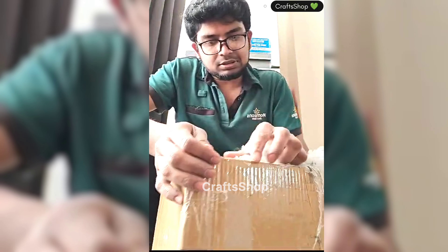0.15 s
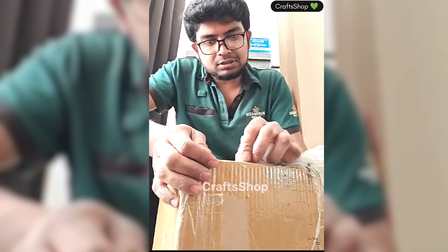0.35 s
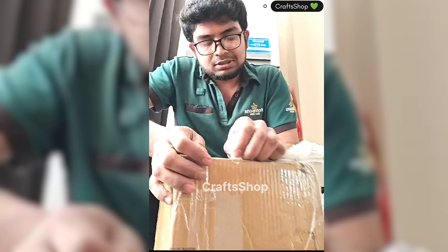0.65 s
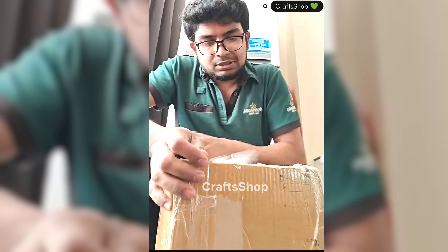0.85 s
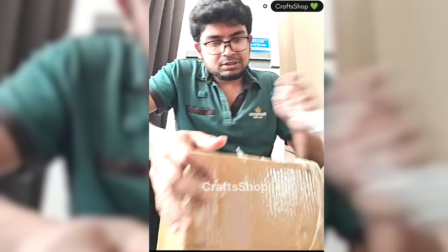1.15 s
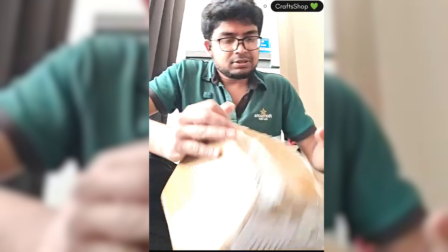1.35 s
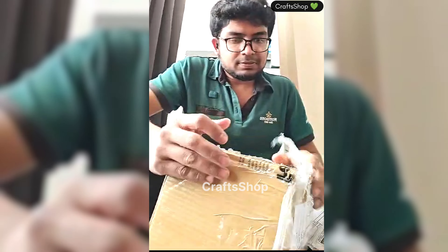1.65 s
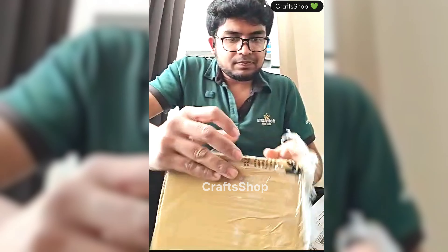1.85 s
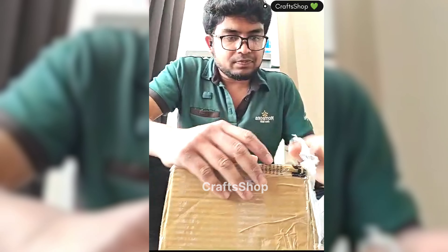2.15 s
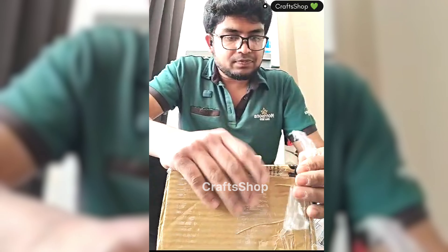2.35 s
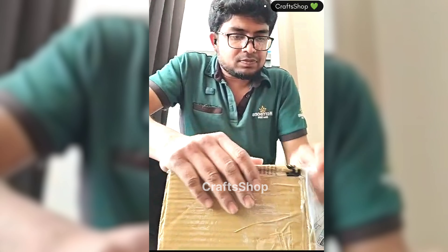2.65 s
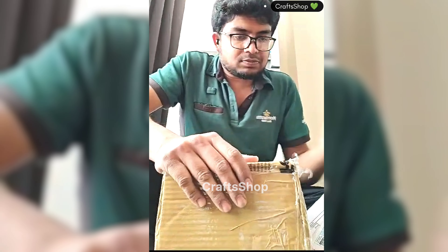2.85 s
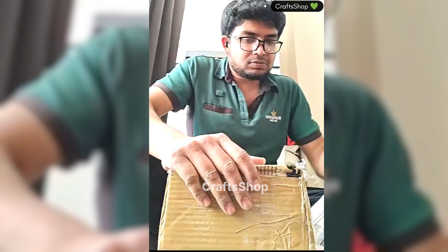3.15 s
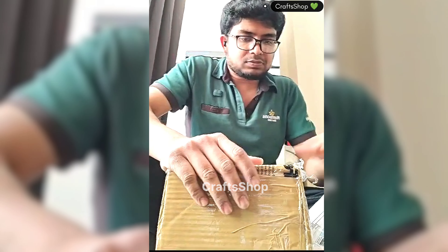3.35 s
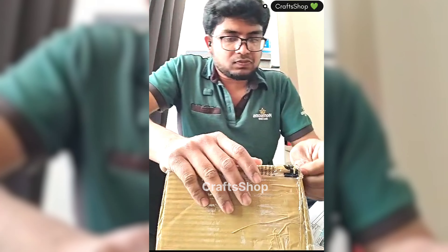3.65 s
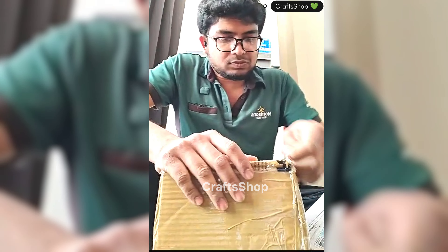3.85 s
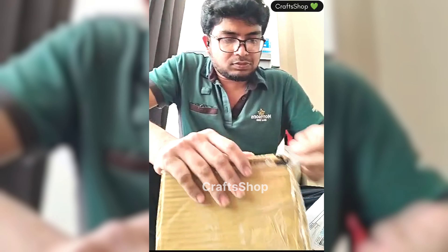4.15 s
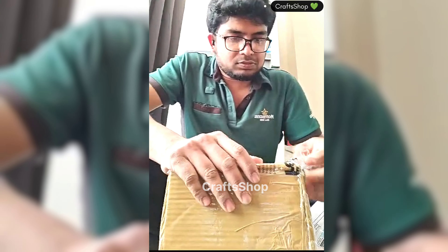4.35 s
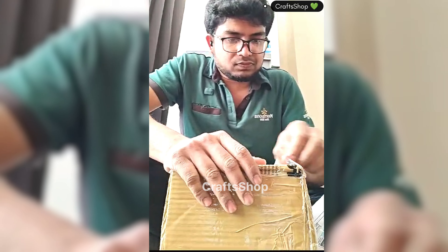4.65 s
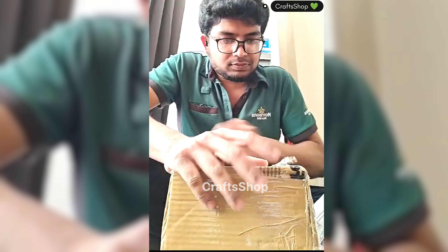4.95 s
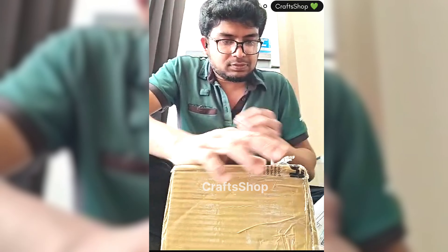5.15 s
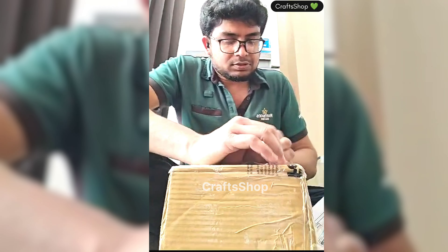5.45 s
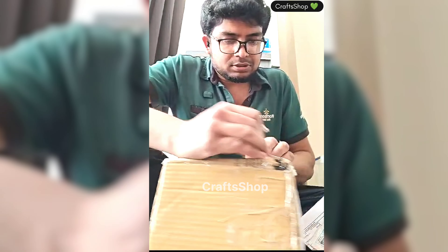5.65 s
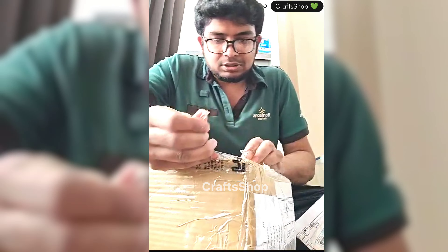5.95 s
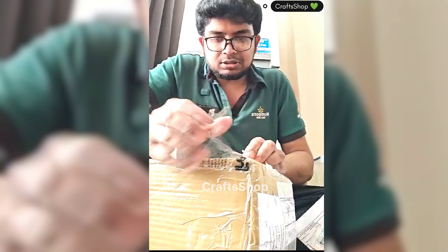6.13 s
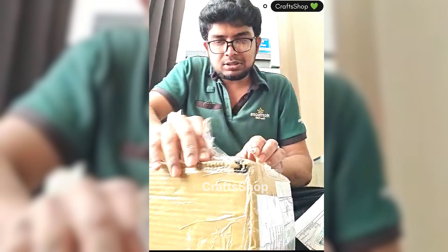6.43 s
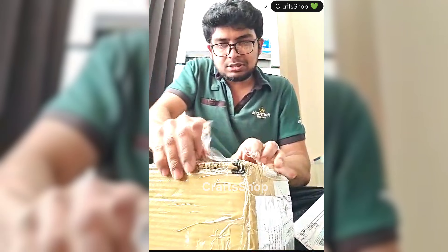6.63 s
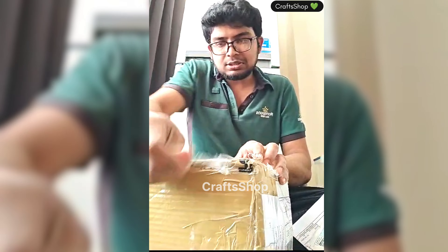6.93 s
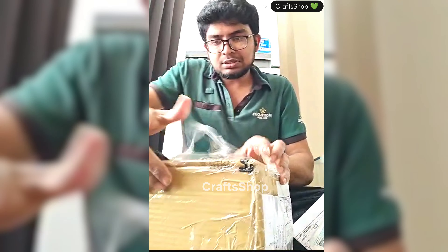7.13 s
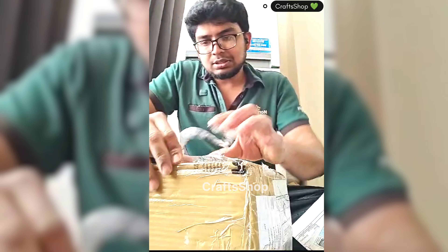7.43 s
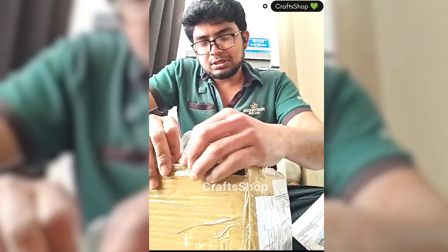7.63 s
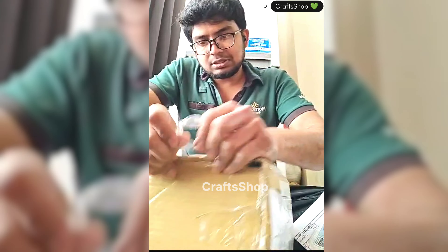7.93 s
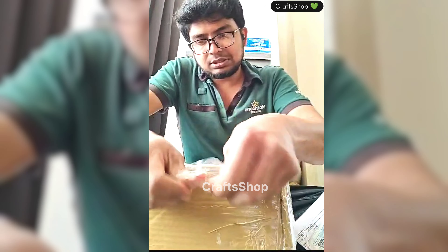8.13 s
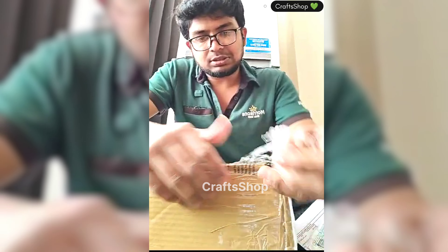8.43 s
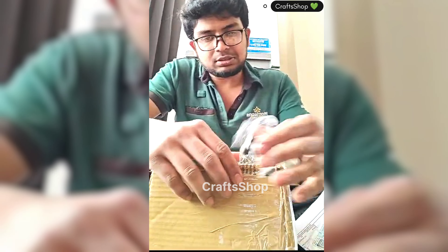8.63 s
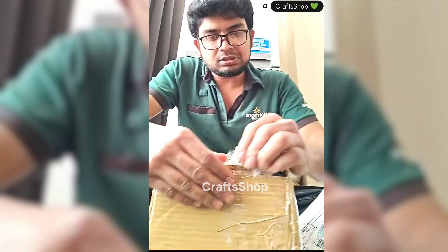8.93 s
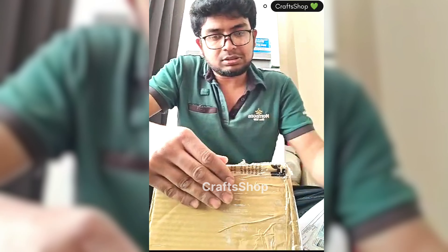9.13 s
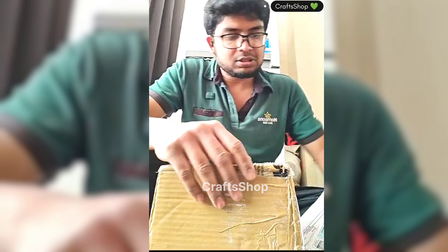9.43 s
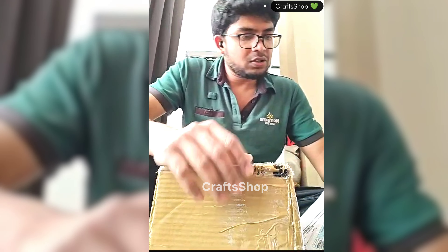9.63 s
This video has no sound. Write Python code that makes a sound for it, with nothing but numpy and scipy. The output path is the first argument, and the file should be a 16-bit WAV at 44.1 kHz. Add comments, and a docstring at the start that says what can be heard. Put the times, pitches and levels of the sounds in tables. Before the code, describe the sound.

Hands peel packing tape and crinkly plastic film off a cardboard box in sharp irregular rips, close up, as an engine passes outside late on.

```python
"""Hands peel packing tape and plastic wrap off a cardboard parcel, heard close up in a small room.
Glue lets go in slips, made of tiny noise spits and plucked rings; single creases snap on top.
The hollow box booms through tuned resonances and thuds on the table with soft low pushes.
Outside, an engine of wavering exhaust partials and road rumble swells, speeds up, then eases back
in level; a faint hush of shaped noise lies under it all."""
import sys
import numpy as np
from scipy import signal
from scipy.fft import rfft, irfft, next_fast_len
from scipy.io import wavfile
from scipy.ndimage import map_coordinates

SR = 44100
rng = np.random.default_rng(int(sys.argv[2]) if len(sys.argv) > 2 else 0)


def int16_out(signal):
    """Quantize to a 16-bit WAV file."""
    q = np.round(np.clip(np.atleast_2d(signal).T, -1, 1) * 32767)
    wavfile.write(sys.argv[1], SR, q.astype(np.int16))


N = 431298  # length in samples

# Pulls and fumbles of the hands. Each row: start in seconds, length in seconds, relative strength in dB,
# then cardboard, thin film and hollow box against that strength, each in dB.
PULLS = [(0.0, 0.048, -31, -7, -11, -20), (0.083, 0.36, -47, -4, -10, -7.5),
         (0.355, 0.12, -40.5, -11, -18, -24.5), (0.57, 0.19, -48.5, -6.5, -7.5, -18.5),
         (0.84, 0.053, -33, -9.5, -2, -6.5), (0.906, 0.016, -24, -1.5, -4, -1),
         (1.091, 0.1, -43.5, -5, -9, -13), (1.23, 0.14, -51, -5, -3.5, -17),
         (1.365, 0.24, -44.5, -5, -7.5, -11), (1.651, 0.012, -29, -6, -8, -11),
         (1.796, 0.4, -48.5, -4.5, -13, -9), (2.388, 0.036, -29, -17.5, -6, -21),
         (2.528, 0.062, -31, -11.5, 0, -22.5), (2.719, 0.041, -33, -22.5, -2.5, -27.5),
         (2.773, 0.1, -19, -13.5, -2.5, -28), (3.084, 0.051, -46.5, -14, -7, -25.5),
         (3.313, 0.018, -63.5, 4, 1, -21.5), (3.533, 0.041, -42.5, -1, -30.5, -3.5),
         (3.682, 0.025, -47, -18, 3, -19), (3.768, 0.081, -21.5, -25.5, -1.5, -22),
         (3.926, 0.077, -22, -19, -1, -18.5), (4.038, 0.09, -17, -46.5, -8, -29.5),
         (4.251, 0.038, -39, -24, -8, -26), (4.477, 0.0032, -47, 2, -18.5, -11.5),
         (4.601, 0.053, -41.5, -14.5, -16.5, -17), (4.748, 0.097, -37, -35.5, -8.5, -15),
         (4.906, 0.11, -13, -16.5, -9, -26), (5.259, 0.22, -59.5, -4.5, 1, -15.5),
         (5.505, 0.11, -42.5, -12.5, -15, -13.5), (5.646, 0.033, -37, 2, -4.5, -4.5),
         (5.699, 0.04, -19.5, -7.5, -7.5, -13), (5.787, 0.19, -22, -9, -10, -10),
         (6.001, 0.059, -24, -14, -5, -8), (6.199, 0.04, -33.5, -0.5, -15, -3),
         (6.509, 0.05, -27, -7, -7, -10.5), (6.597, 0.037, -39, -1, -1.5, 0),
         (6.678, 0.17, -16, -12.5, -10, -14.5), (6.867, 0.052, -24.5, -10, 0, -9.5),
         (7.125, 0.0055, -31.5, -68, -1.5, -21), (7.251, 0.0038, -31, -7.5, -2.5, -5.5),
         (7.478, 0.18, -52, -8, -10, -18), (7.706, 0.089, -44.5, -7.5, -10, -12.5),
         (7.812, 0.042, -24, -13.5, -4, -12.5), (7.917, 0.14, -35, -9, -7.5, -11),
         (8.241, 0.087, -32.5, -6, -1, -10.5), (8.381, 0.015, -24, -9, -2, -10),
         (8.523, 0.15, -61, 1.5, 0, 14), (8.852, 0.096, -48, -4.5, -1, 4),
         (9.021, 0.032, -49.5, -14, -4.5, -14), (9.077, 0.059, -16, -5.5, -0.5, -24.5),
         (9.375, 0.028, -54.5, -13, 1, -1), (9.677, 0.008, -27.5, -18, 4.5, -31)]
# Pitch of the loose end of tape. Each row: time in seconds, centre pitch in Hz.
FLAP = [(0, 4160), (3.98, 4279), (4.08, 2483), (4.3, 2300), (4.89, 4300), (4.916, 2940), (4.94, 4400),
        (5.0, 2437), (5.71, 2123), (5.79, 4161), (5.9, 2630), (6.08, 2400), (6.2, 4200), (6.7, 2800),
        (6.78, 4060), (6.92, 1950), (7.1, 4400), (8.9, 3650), (9.1, 2484)]
# Colour of peeling tape. Each row: frequency in Hz, relative gain in dB.
TAPE_COLOUR = [(180, -54), (300, -12.5), (360, -9), (486, -7), (555, -3), (883, -4), (1030, -3.5),
               (1610, -6.5), (2130, 1), (3390, -1.5), (4140, 6), (7050, -7), (11000, 3.5), (12600, -4),
               (15900, -2)]
# Likeness of left and right, as creases lie all over the parcel. Each row: frequency in Hz, likeness 0 to 1.
ALIKE = [(300, 1), (1000, 0.4), (5000, 0.25), (12000, 0.12)]
# Single creases flipping. Each row: start in seconds, relative level in dB, pitch in Hz.
SNAPS = [(0.115, -12.5, 4630), (0.3803, -14.5, 4200), (0.5218, -24.5, 4730), (0.5716, -5.5, 4040),
         (0.602, -17.5, 1530), (0.6794, -5.5, 4450), (0.7095, -14.5, 4880), (0.7312, -22, 4397),
         (0.7874, -19, 4550), (0.823, -17.5, 4280), (0.8387, -11, 2250), (1.103, -22, 2700),
         (1.4085, -11.5, 4260), (1.654, -5, 4900), (2.047, -15.5, 4464), (2.409, -9, 2160),
         (2.4227, -10.5, 5000), (2.5275, -10.5, 4560), (2.5551, -5, 2920), (2.707, -16.5, 1499),
         (2.728, -11, 4550), (2.7676, -1.5, 3983), (3.5284, -19.5, 4160), (3.6823, -23.5, 2514),
         (3.7658, -4, 4280), (3.814, -3.5, 4081), (3.8253, -11, 4270), (3.842, -14.5, 4256),
         (3.925, -6, 4110), (4.0293, -14.5, 3212), (4.0378, 2, 4700), (4.1091, -10, 2330),
         (4.1208, -10.5, 2300), (4.256, -14, 4256), (4.2733, -15.5, 2085), (4.4739, -14.5, 4103),
         (4.6562, -26, 2113), (4.7375, -18, 2820), (4.8278, -5, 4190), (4.8367, -14, 4304),
         (4.8732, -4.5, 4850), (5.7498, -1, 4490), (5.7867, 3.5, 4438), (5.7894, -1, 4400),
         (5.7958, -4.5, 4410), (5.814, -3, 4470), (5.8188, -5.5, 3960), (5.838, -9.5, 4310),
         (5.8426, -3.5, 2500), (5.847, 1, 4424), (5.8739, 1, 3976), (5.898, -7, 2590), (5.911, 1.5, 2630),
         (5.935, -3, 3799), (6.0187, -1.5, 2240), (6.0287, -4, 1263), (6.0816, -8.5, 2550),
         (6.2032, -4, 4187), (6.226, -10, 4140), (6.247, -6.5, 4267), (6.6517, -4, 4137),
         (6.762, -16, 3960), (6.9211, -4.5, 2110), (7.0828, -24.5, 2910), (7.7773, -7, 3974),
         (7.8148, -9.5, 4142), (7.827, -2, 4566), (7.9152, -4.5, 4536), (7.9415, -2, 4917),
         (7.967, -6, 4540), (8.0399, -4, 4180), (8.2515, -8.5, 2038), (8.334, -14, 4300),
         (8.3963, -9.5, 4200), (9.6725, -10.5, 3080)]
# Box meeting table or hand. Each row: start in seconds, relative level in dB, pitch in Hz.
THUDS = [(0.206, -31.5, 310), (0.92, -13.5, 251), (1.652, -12, 70), (1.682, -13, 110.4), (2.042, -4.5, 82),
         (2.165, -21, 79.97), (3.529, -13, 178.1), (4.733, -20.5, 192), (5.033, -23, 109),
         (6.358, -25.5, 163), (6.957, -16, 209), (7.484, -21, 108)]
# Resonances of the hollow parcel. Each row: centre in Hz, width in Hz, relative gain in dB.
BOX_MODES = [(96.5, 24, -6.5), (169, 28, -1), (256.9, 13, 8), (580, 50, -21), (700, 26, -8)]
# Where the hands work. Each row: time in seconds, left over right in dB.
PLACE = [(0, -9), (2.2, -10.5), (2.7, -9.5), (4, -8.5), (6.8, -8.5), (9.78, -11)]
# Colour difference between the two listening ports. Each row: frequency in Hz, left over right in dB.
PORTS = [(40, -2), (180, 9.5), (550, 2), (2000, 7.5), (5000, 3.5), (9000, 7), (14500, 12)]
# Decay of the room. Each row: frequency in Hz, time to fall 60 dB in seconds.
ROOM_DECAY = [(200, 0.36), (2000, 0.37), (10000, 0.27)]
# Room against direct sound. Each row: frequency in Hz, gain in dB.
WET = [(100, -15), (300, -6.5), (1000, -12.5), (5000, -9.5), (14000, -9)]
# Course of the engine. Each row: time in seconds, firing rate in Hz, relative level in dB.
ENGINE = [(5.1, 25.18, -78), (5.5, 24.53, -57.5), (6.4, 26.2, -59.5), (7.2, 26.9, -76), (8.1, 26.59, -53),
          (8.5, 26.88, -49), (8.9, 27.4, -44.5), (9.03, 27.58, -41), (9.2, 28.93, -46),
          (9.55, 29.07, -46.5), (9.78, 30.6, -52)]
# Exhaust partials. Each row: multiple of the firing rate, relative level in dB.
EXHAUST_PARTIALS = [(4, 4.5), (5, -2.5), (7, 0), (8, 0.5), (9, -9), (13, -13.5), (15, -16.5), (17, -25.5),
                    (21, -22.5)]
# Colour of the room tone. Each row: frequency in Hz, relative gain in dB.
AIR = [(15, -21), (25, 8.5), (153, 8.5), (206, 10.5), (450, -13), (751, -2), (1640, -45.5), (4120, -7.5),
       (7260, -18.5), (15900, -101)]

RISE_DB_PER_S, FALL_DB_PER_S = 1300, 380  # a pull sets in fast and peters out slowly
IDLE_DB = -67  # the wrap never quite stops rustling
BOOM_HZ, BOOM_WIDTH_HZ, BOOM_DB = 136.3, 3, 22  # a room mode swells the partial passing through it
AIR_DB = -60  # level the hush drifts around
TOP_HZ = 15950  # upper band limit


def peel(pull_db, card_db, film_db, box_db):
    """Glue slips in short spits of noise: hard pulls rip in a fast, even stutter, light ones mostly rustle."""
    hard = np.clip((pull_db + 32) / 18, 0, 1)
    rate = (110 + 130 * hard) * amp(4 * wobble(20))  # slips per second
    slip_count = np.floor(np.cumsum(rate / SR) + .45 * wobble(400))
    at = np.flatnonzero(np.diff(slip_count) > 0)

    # Light pulls slip more unevenly.
    luck = rng.exponential(1, N)[at].clip(0, 2.5) - 1.3
    slips = np.zeros(N)
    slips[at] = amp((5.5 - 3 * hard[at]) * luck) / np.sqrt(rate[at])
    letting_go = np.gradient(pull_db) * SR < -FALL_DB_PER_S / 2
    slips[letting_go] *= .4  # once the hand lets go the glue hardly slips

    t = np.arange(SR // 100) / SR
    spit = np.convolve(slips, t * np.exp(-t / .00018))[:N]  # swells and dies in about a millisecond

    # No two slips pluck the loose end alike.
    flap_hz, = curves(FLAP)
    hz = (flap_hz * amp(1.78 * rng.standard_normal(N)))[at, None]
    pluck_shape = (1 - np.exp(-2 * t * hz)) * np.exp(-t * hz / 2.2)
    rings = slips[at, None] * np.sin(2 * np.pi * hz * t) * pluck_shape
    ring_at = at[:, None] + np.arange(len(t))
    plucks = unit(np.bincount(ring_at.ravel(), rings.ravel(), N)[:N])

    rustle = amp(3.5 * wobble(70))  # countless small creases between the slips
    burst = pair((.6 + .45 * hard) * unit(spit) + (.75 - .55 * hard) * rustle)
    card, wide, narrow, film = parts(burst)

    # The loose end changes size, so the crackle changes colour.
    flap_tilt_db = 4 * np.log2(3300 / flap_hz) + 2 * wobble(18)
    tape = .75 * (amp(flap_tilt_db) * wide + amp(-flap_tilt_db) * narrow) + .6 * plucks

    shake = amp(pull_db + box_db)
    boom = unit(box(shake * burst.mean(axis=0))) * np.sqrt(np.mean(shake ** 2))
    film_db = film_db + 3 * wobble(40)  # thin film crackles in its own short clumps
    return amp(pull_db) * (tape + amp(card_db) * card + amp(film_db) * film) + boom


def pulls():
    """Hand effort: power-summed strength, and power-weighted cardboard, film and box shares, in dB."""
    start, length, db, *shares = np.transpose(PULLS)[..., None]
    t = np.arange(0, N / SR, .001)
    rise_db = RISE_DB_PER_S * np.maximum(start - t, 0)
    fall_db = FALL_DB_PER_S * np.maximum(t - start - length, 0)
    power = amp(2 * (db - rise_db - fall_db)) + amp(2 * IDLE_DB) / len(PULLS)
    total = power.sum(axis=0)
    heard_shares = [(power * share).sum(axis=0) / total for share in shares]
    return curves(np.transpose([t, 10 * np.log10(total)] + heard_shares))


def snaps(card_db, film_db):
    """A crease flips: about a millisecond of noise and a few cycles at the pitch of the flap."""
    t = np.arange(SR // 50) / SR
    spit, ring = np.zeros((2, N + len(t)))
    for s, db, hz in SNAPS:
        k = round(s * SR)
        spit[k:k + len(t)] += amp(db) * t / 0.00065 * np.exp(1 - t / 0.0005)
        ring[k:k + len(t)] += amp(db) * np.sin(2 * np.pi * hz * t) * np.exp(-t * hz / 2.2)
    card, wide, narrow, film = parts(pair(spit[:N]))
    noisy = wide + narrow + amp(.5 * card_db - 11) * card + amp(.5 * film_db) * film
    return 0.43 * np.sqrt(np.mean(spit ** 2)) * noisy + 0.7 * ring[:N]


def thuds():
    """A soft low push wanders in pitch in the limp cardboard, while box and table shudder as low noise."""
    out, t = np.zeros(N + SR), np.arange(SR // 3) / SR
    for s, db, hz in THUDS:
        wander = np.cumsum(rng.standard_normal(len(t))) * (hz / 2300) ** 2
        push = -np.sin(2 * np.pi * hz * t + wander) * t / 0.0071 * np.exp(1 - t / 0.004)
        low_pass = signal.butter(2, 2.8 * hz, fs=SR)
        shudder = unit(signal.lfilter(*low_pass, rng.standard_normal(len(t))))
        shudder *= amp(-60 * t / 0.14) * (1 - np.exp(-t / 0.0026))
        out[round(s * SR):][:len(t)] += amp(db) * (push + 0.23 * shudder)
    return out[:N] + amp(-10) * box(out[:N])


def box(blows):
    """The hollow parcel rings in parallel resonances with whatever shakes it."""
    def response(f):
        total = 0
        for k, (centre, width, db) in enumerate(BOX_MODES):
            drive = 1j * f * width
            # Neighbouring modes alternate in sign.
            total = total + (-1) ** k * amp(db) * drive / (centre * centre - f * f + drive)
        return total
    return filtered(blows, response)


def parts(burst):
    """Tape-coloured bands: cardboard, wide and narrow flaps, film; both flaps share one scale, the rest rms 1."""
    x = filtered(burst, causal(TAPE_COLOUR))
    card, wide, narrow = (filtered(x, lambda hz: below(hz, edge_hz)) for edge_hz in (1600, 3300, 6500))
    tape = np.sqrt(np.mean((narrow - card) ** 2))
    return unit(card), (wide - card) / tape, (narrow - wide) / tape, unit(x - narrow)


def pair(envelope):
    """Noise under one envelope at two ports, a mid and side mix setting how alike they are."""
    def mid_side_gains(hz):
        angle = np.arccos(np.clip(along(ALIKE, hz), -1, 1)) / 2
        return np.array([np.cos(angle), np.sin(angle)])
    mid, side = filtered(envelope * rng.standard_normal((2, N)), mid_side_gains)
    return np.array([mid + side, mid - side])


def room(x):
    """Walls and table answer as decaying noise, each frequency at its own speed, unlike at each port."""
    hz, t, z = signal.stft(rng.standard_normal((2, SR // 3)), SR, nperseg=256)
    decay = amp(-60 * t / along(ROOM_DECAY, hz)[:, None])
    tail = signal.istft(z * decay, SR, nperseg=256)[1]
    delayed = np.pad(x, ((0, 0), (150, 0)))  # the answer starts 150 samples late
    wet = signal.fftconvolve(delayed, tail / np.linalg.norm(tail[0]), axes=1)[:, :N]
    return filtered(wet, lambda f: amp(along(WET, f)))


def engine():
    """Exhaust partials on the firing rate, each wavering as the vehicle moves, over road rumble."""
    hz, level_db = curves(ENGINE)
    turn = 2 * np.pi * np.cumsum(hz) / SR
    tone = np.zeros(N)
    for k, db in EXHAUST_PARTIALS:
        boom_db = BOOM_DB / (1 + ((k * hz - BOOM_HZ) / BOOM_WIDTH_HZ) ** 2)
        level = amp(db + boom_db + 5.5 * wobble(6))
        tone += level * np.sin(k * turn + rng.uniform(0, 2 * np.pi) + .9 * wobble(8))
    road = filtered(rng.standard_normal(N), lambda f: below(f, edge_hz=660) * (1 - below(f, edge_hz=80)))
    started = np.arange(N) > ENGINE[0][0] * SR
    return started * amp(level_db) * (tone + amp(-11.5) * unit(road))


def room_tone():
    """A faint, slowly drifting hush of shaped noise, partly alike on both sides."""
    mid, side = filtered(rng.standard_normal((2, N)), lambda hz: amp(along(AIR, hz)))
    side = 0.5 * side
    return amp(AIR_DB + 3.1 * wobble(1.3)) * unit(np.array([mid + side, mid - side]))


def amp(db):
    """Decibels to gain."""
    return 10 ** (np.asarray(db) / 20)


def unit(x):
    """Scaled to rms 1."""
    return x / np.sqrt(np.mean(x ** 2) + 1e-20)


def along(points, hz):
    """Values between (Hz, value) points on a log frequency axis."""
    f, v = np.transpose(points)
    return np.interp(np.log(hz + 1), np.log(f + 1), v)


def curves(rows):
    """One value per sample for each column after the time."""
    s, *cols = np.transpose(rows)
    return [np.interp(np.arange(N) / SR, s, c) for c in cols]


def wobble(rate):
    """A smooth random curve, rate knots a second."""
    coarse = np.arange(0, N + 16, 16)
    knots = rng.standard_normal(int(N * rate / SR) + 4)
    return np.interp(np.arange(N), coarse, map_coordinates(knots, [coarse * rate / SR]))


def filtered(x, response):
    """The spectrum of x times a complex response of frequency."""
    m = 2 * next_fast_len(N // 2 + SR // 4)
    return irfft(rfft(x, m) * response(np.fft.rfftfreq(m, 1 / SR)), m)[..., :N]


def causal(points):
    """The minimum-phase response with the gains of (Hz, dB) points."""
    def response(hz):
        # Folding the cepstrum forward leaves no ringing ahead of the sound.
        cep = irfft(np.log(amp(along(points, hz)) + 1e-6))
        cep[1:len(hz) - 1] *= 2
        cep[len(hz):] = 0
        return np.exp(rfft(cep))
    return response


def below(hz, edge_hz):
    """A smooth low-pass share, 1 to 0."""
    return 1 / (1 + (hz / edge_hz) ** 6)


def scene():
    """The hands' sounds, placed and echoed, with the engine and the room tone."""
    pull_db, card_db, film_db, box_db = pulls()
    hands = peel(pull_db, card_db, film_db, box_db) + snaps(card_db, film_db) + thuds()
    sides = np.array([[.5], [-.5]])  # half of each dB difference to the left, half to the right
    near = np.array([np.pad(hands[0], (2, 0))[:N], hands[1]])  # the right port is slightly nearer
    placed = (near + room(hands)) * amp(sides * curves(PLACE)[0])
    ports = filtered(placed, lambda hz: amp(sides * along(PORTS, hz)))
    return ports + engine() + room_tone()


def record(dry):
    """Peaks bend softly towards full scale, then everything above the band limit is cut."""
    soft = dry / (1 + np.abs(dry) ** 10) ** (1 / 10)
    return filtered(soft, lambda hz: hz < TOP_HZ)


dry = scene()
out = record(dry)
int16_out(out)
```